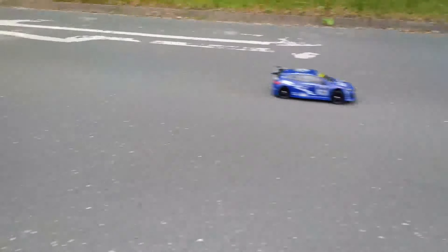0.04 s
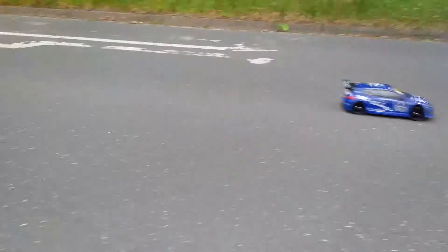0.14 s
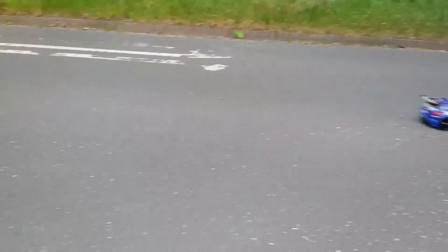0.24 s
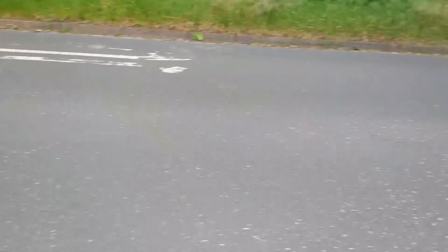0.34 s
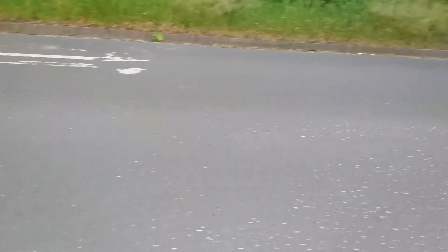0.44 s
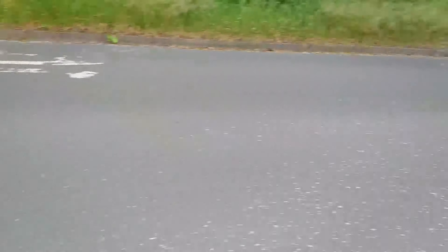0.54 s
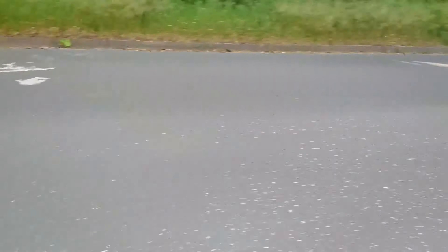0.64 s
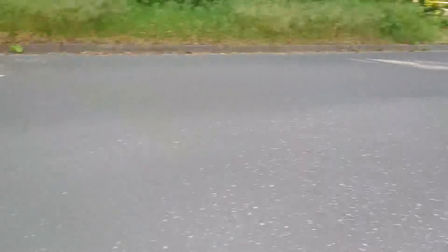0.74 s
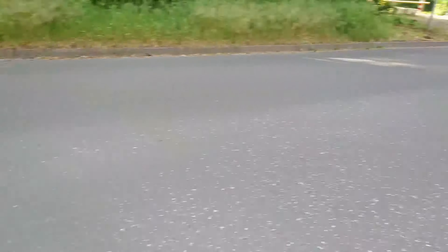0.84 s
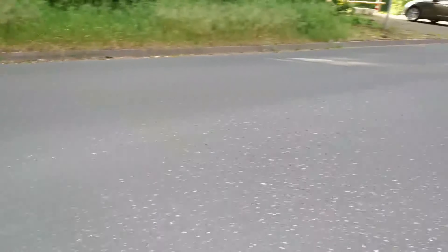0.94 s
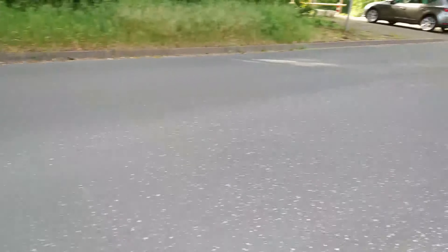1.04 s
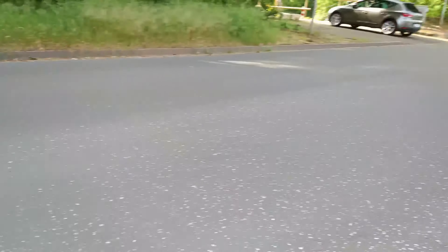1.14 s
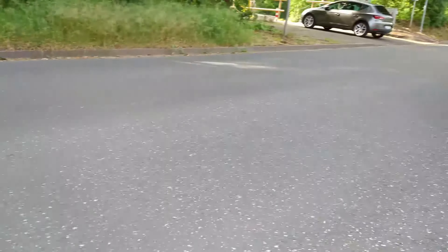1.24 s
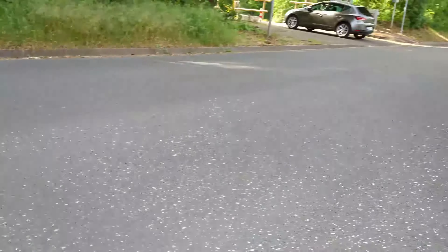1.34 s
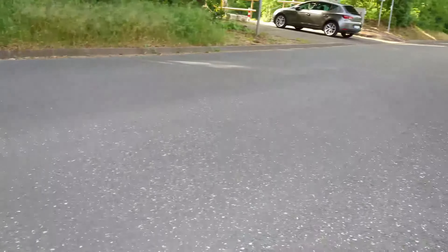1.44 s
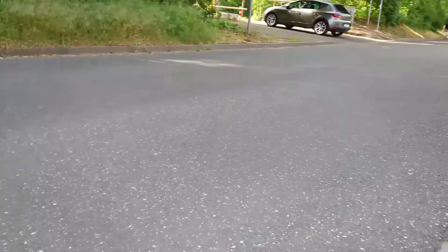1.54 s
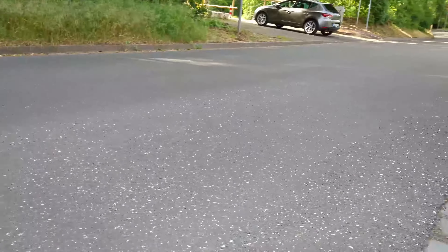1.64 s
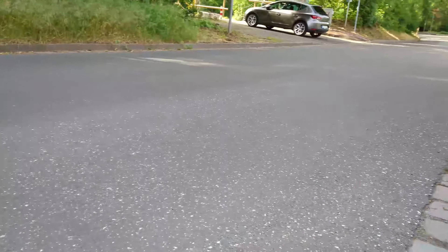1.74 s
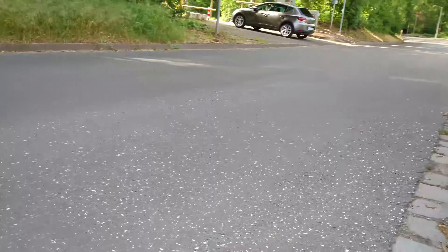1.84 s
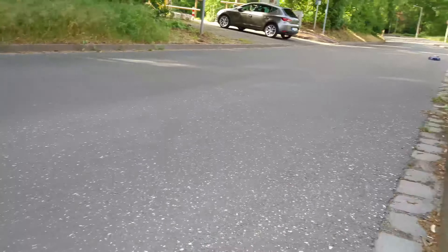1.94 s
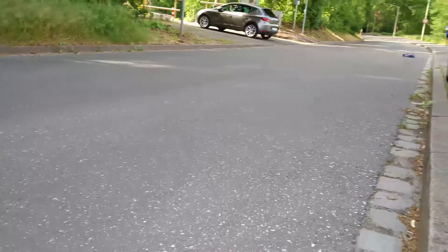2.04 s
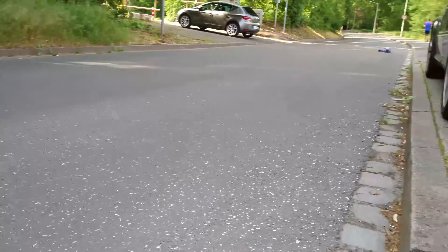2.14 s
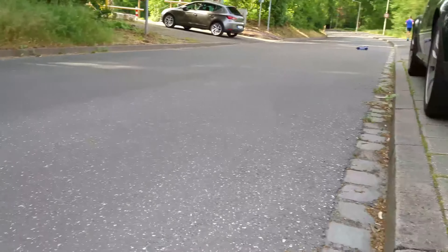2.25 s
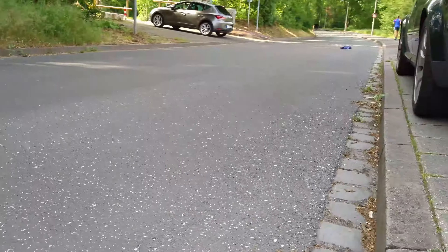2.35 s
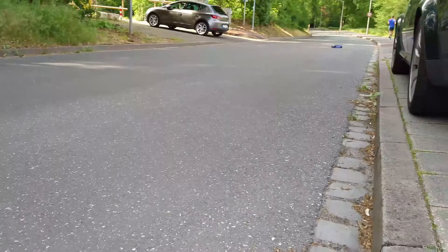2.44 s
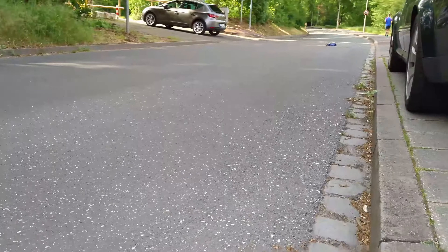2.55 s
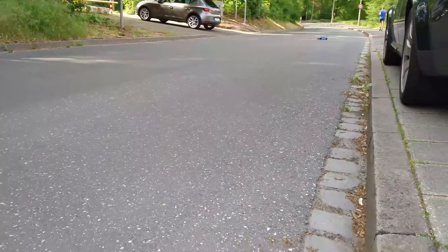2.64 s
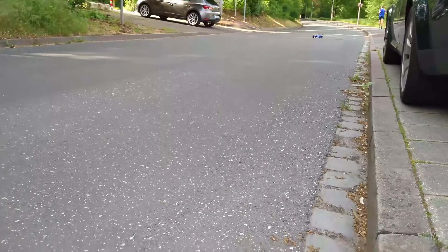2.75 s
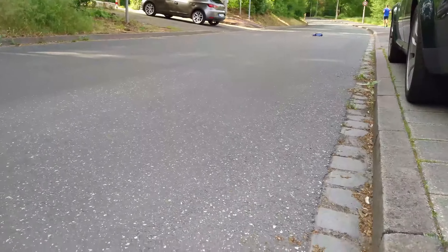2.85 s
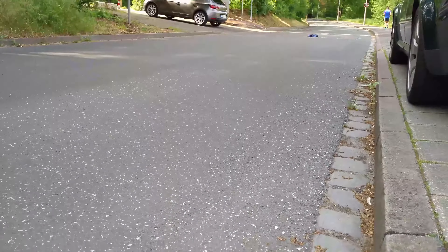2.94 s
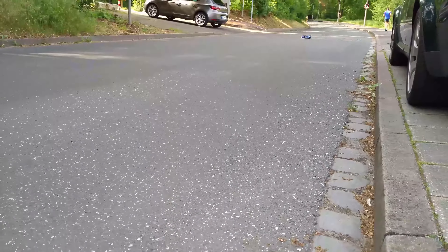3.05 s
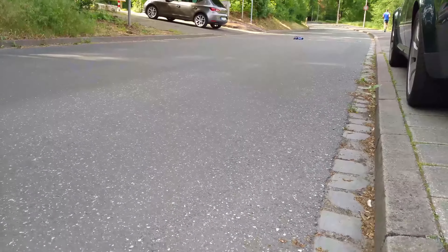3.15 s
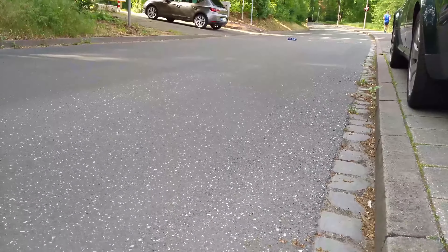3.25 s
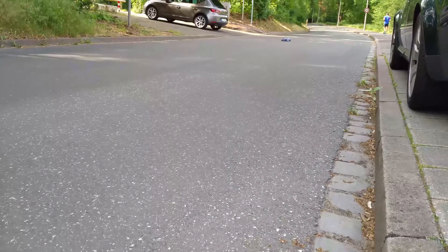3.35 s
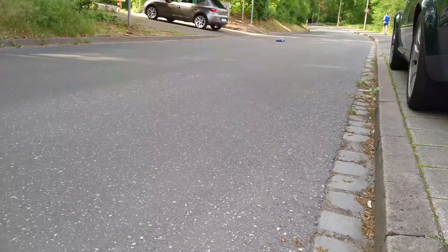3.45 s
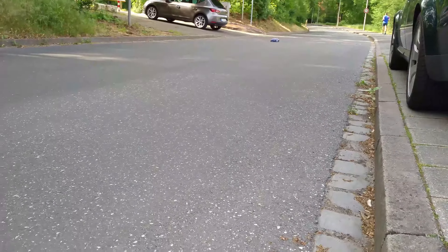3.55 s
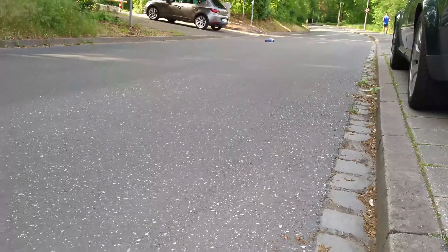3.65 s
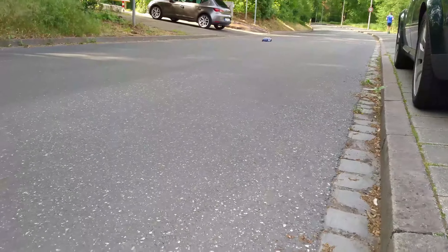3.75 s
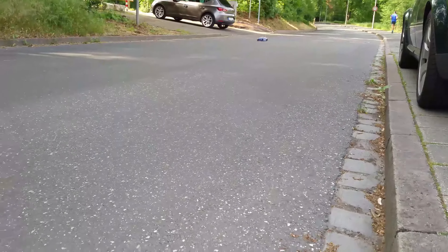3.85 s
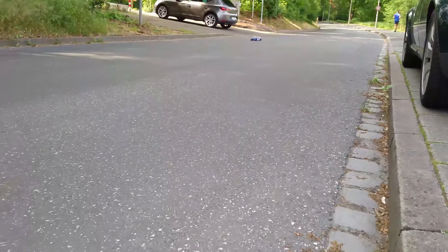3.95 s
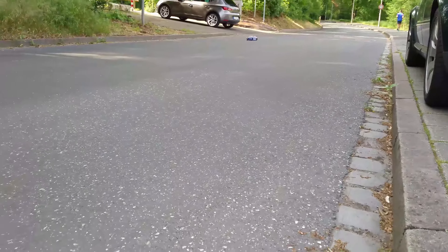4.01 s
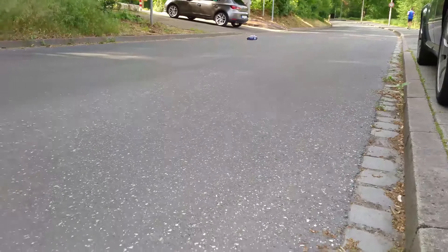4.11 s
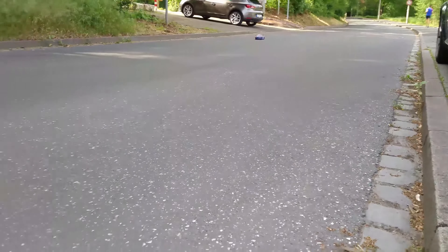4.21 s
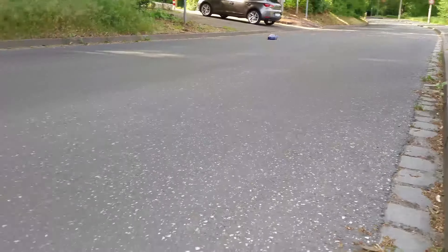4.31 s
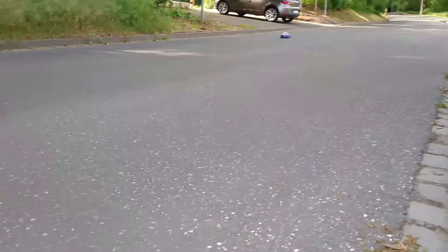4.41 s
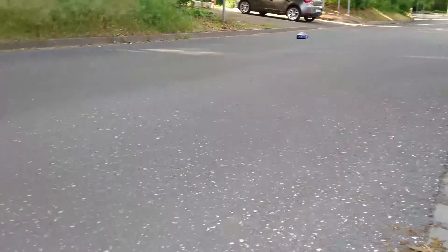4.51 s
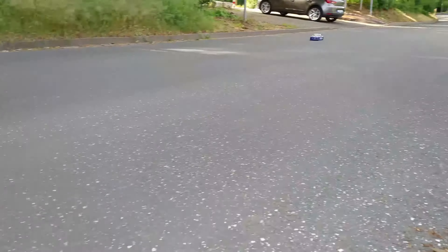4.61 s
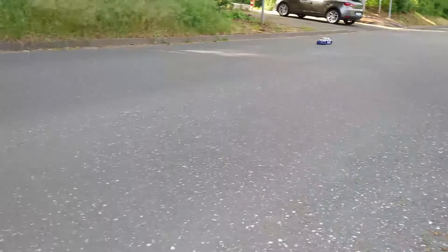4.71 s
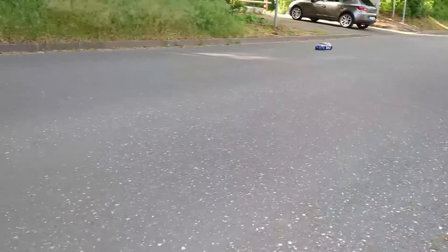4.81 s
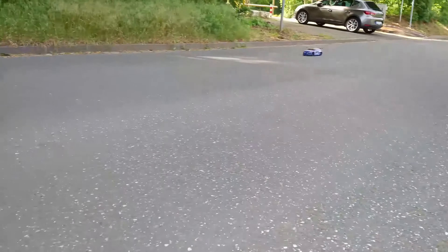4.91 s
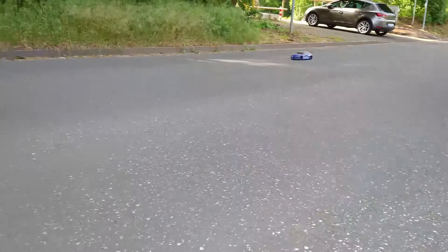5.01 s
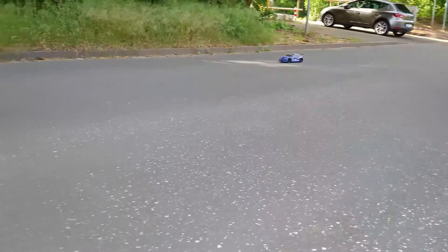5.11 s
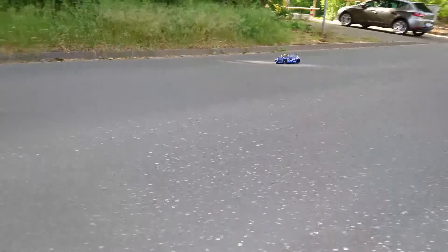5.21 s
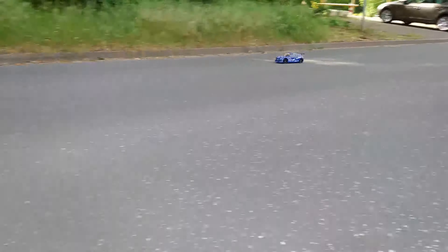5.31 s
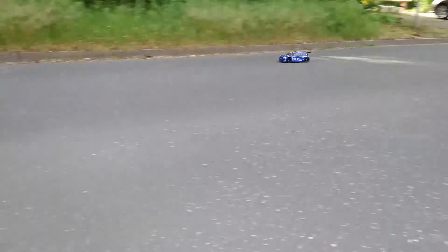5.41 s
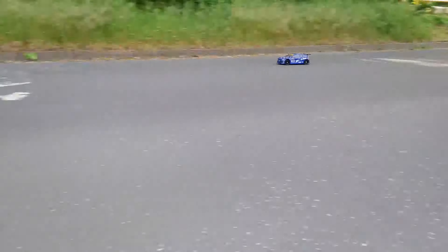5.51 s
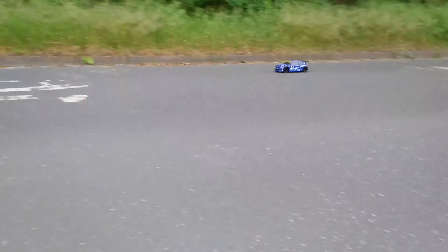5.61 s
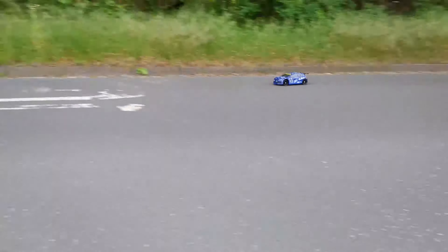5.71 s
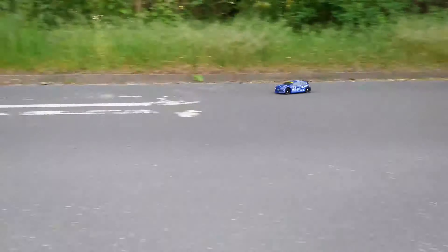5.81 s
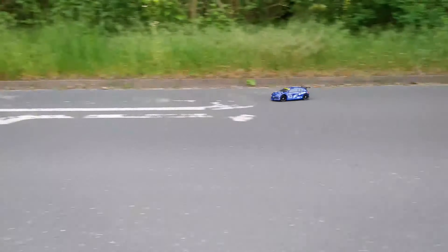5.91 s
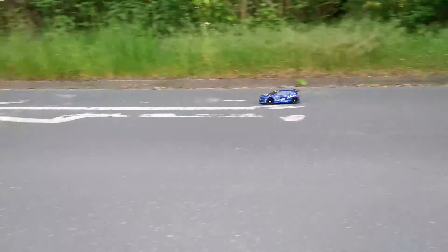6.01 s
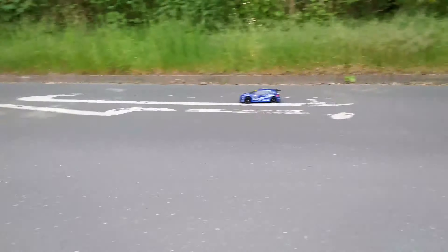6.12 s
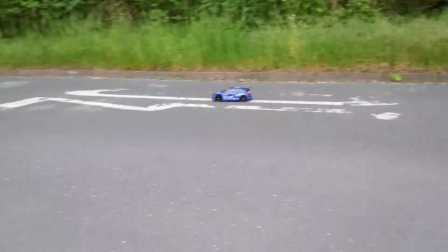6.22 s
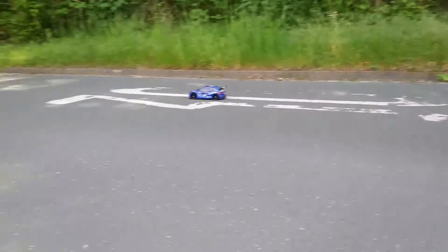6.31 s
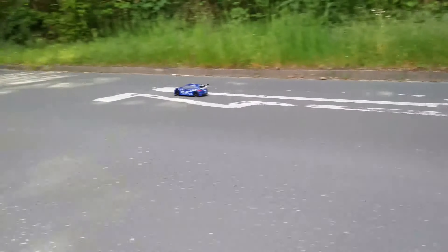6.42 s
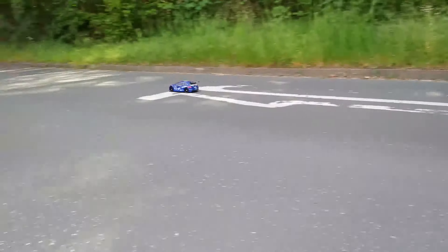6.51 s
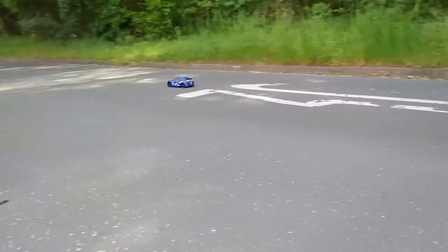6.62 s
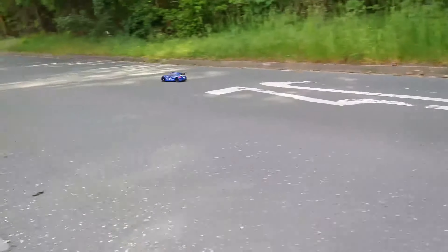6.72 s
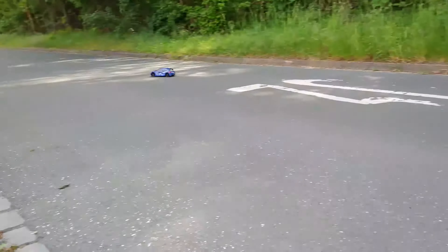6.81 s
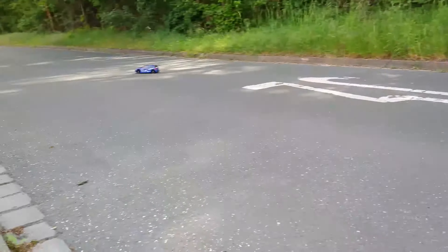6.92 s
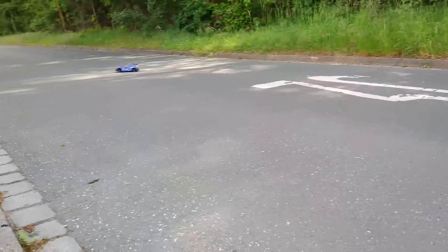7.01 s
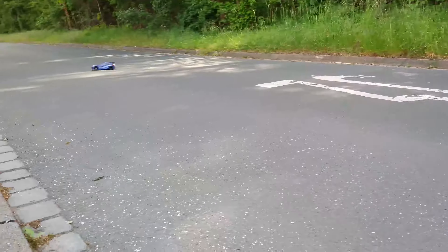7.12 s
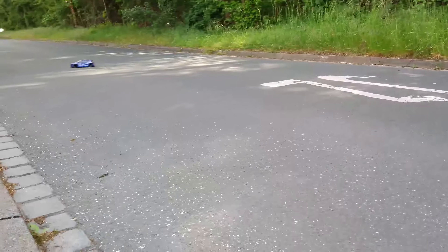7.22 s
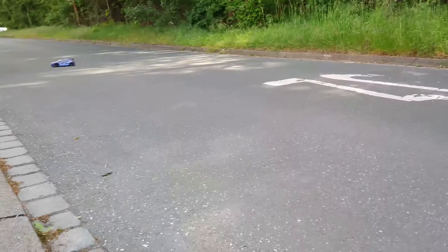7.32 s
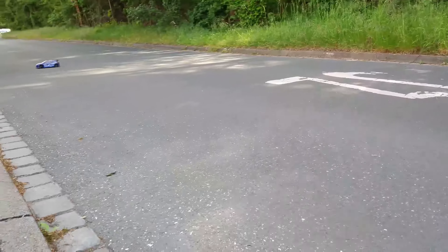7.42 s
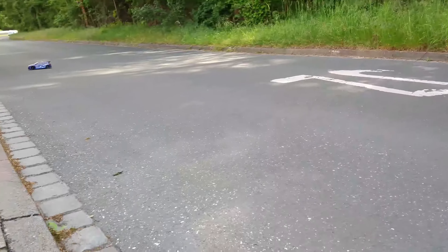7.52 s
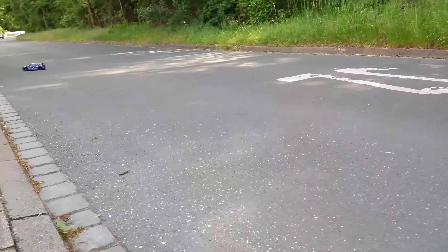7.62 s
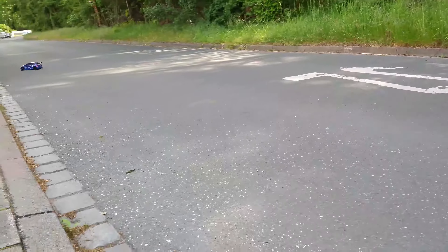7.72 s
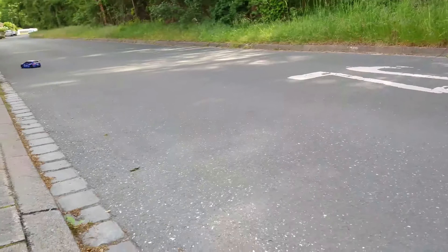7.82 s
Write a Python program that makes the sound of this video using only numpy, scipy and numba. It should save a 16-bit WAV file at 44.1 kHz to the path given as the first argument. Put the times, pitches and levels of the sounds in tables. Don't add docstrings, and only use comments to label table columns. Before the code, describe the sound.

A radio-controlled car close by screams away on asphalt, its gritty gear whine rising in pitch and fading within a second. Faint tyre hiss, then hollow plastic knocks as it turns far off. A short throttle chirp, then the whine returns, swells past with rapid gear ticks, cuts off and brakes with a falling whirr. Outdoor street, faint distant rumble, handheld phone near the kerb, thin and bright.

```python
import sys
import numpy as np
from scipy import signal
from scipy.fft import rfft, irfft
from scipy.io import wavfile
from scipy.ndimage import uniform_filter1d, map_coordinates
from numba import njit

SR = 44100
rng = np.random.default_rng(int(sys.argv[2]) if len(sys.argv) > 2 else 0)


def amplitude_ratio(level_db):
    exponent = np.asarray(level_db, float) / 20
    return 10 ** exponent


def unload_wav(signal):
    wavfile.write(
        sys.argv[1],
        SR,
        np.round(np.clip(np.atleast_2d(signal).T, -1, 1) * 32767).astype(np.int16),
    )


N = 346626


def level(x, db):
    return x * amplitude_ratio(db) / np.sqrt(np.mean(x ** 2))


def track(rows):
    s, *columns = np.transpose(rows)
    t = np.arange(N) / SR
    gate = np.clip(np.minimum(t - s[0], s[-1] - t) / 0.025 + 1, 0, 1)
    return [np.interp(t, s, c) for c in columns] + [gate]


def swells(rows, step=64):
    t = np.arange(N) / SR
    s, half, *columns = np.transpose(rows)
    bell = np.exp(-((t[::step, None] - s) / np.maximum(half, .005)) ** 2)
    return [np.interp(t, t[::step], bell @ c) for c in columns]


def walk(rate):
    coarse = np.repeat(rng.standard_normal(int(rate * N / SR) + 2), 4)
    coarse = uniform_filter1d(coarse, 4)
    return 1.25 * np.interp(np.arange(N) * 4 * rate / SR, np.arange(len(coarse)), coarse)


@njit
def svf(x, hz, width):
    y, state, g, k = x.copy(), np.zeros(4), 0., 0.
    for i in range(len(x)):
        if i % 32 == 0:
            g, k = np.tan(np.pi * hz[i] / SR), width / hz[i]
        for j in (0, 2):
            v = (state[j] + g * (y[i] - state[j + 1])) / (1 + g * (g + k))
            state[j], state[j + 1], y[i] = 2 * v - state[j], state[j + 1] + 2 * g * v, k * v
    return y


def delay(x, samples):
    return map_coordinates(x, [np.arange(N) - samples], order=1, mode="nearest")


def spur(mesh_hz, sharp, scatter_db):
    teeth = 81
    turn = np.cumsum(mesh_hz / teeth * (1 + 0.0812 * walk(40))) / SR
    force = amplitude_ratio(scatter_db * rng.standard_normal(2000))[turn.astype(int) % 2000]
    bite = np.abs(np.sin(np.pi * turn)) ** (2 * np.maximum(sharp, .1))
    return level(0.77 + force * bite, 0)


# start in seconds, tooth mesh in Hz, level in dB.
LEAVING = [(0, 5340, -22), (.1, 5750, -20), (.2, 6240, -19), (.35, 6674, -12), (.48, 6950, -19),
           (.6, 7350, -33), (.8, 7680, -36), (1.15, 7510, -43)]
TURNING = [(2.41, 1550, -50), (2.5, 1650, -54), (2.62, 1850, -59), (2.72, 2300, -55), (2.85, 2350, -58),
           (2.96, 2650, -50), (3.06, 3050, -53), (3.15, 3300, -59)]
SURGING = [(3.22, 3250, -64), (3.3, 3380, -58), (3.4, 3550, -55), (3.5, 3850, -55), (3.58, 4050, -60)]
BLIP = [(3.69, 4800, -56), (3.77, 5050, -46), (3.83, 5250, -41), (3.89, 5330, -38), (3.945, 5400, -41),
        (3.97, 5400, -55)]
NEARING = [(4.149, 5160, -58), (4.249, 5160, -44.5), (4.4, 5250, -44), (4.55, 5610, -40),
           (4.68, 6010, -31.5), (4.8, 6080, -34), (4.94, 6100, -39)]
PASSING = [(5.02, 6150, -47), (5.12, 6165, -36.5), (5.4, 6470, -25.5), (5.55, 6460, -29.5),
           (5.88, 6380, -26), (6.08, 6570, -20), (6.2, 6630, -28), (6.4, 6765, -26.5), (6.66, 6710, -26.5)]
BRAKING = [(7.08, 3196, -56), (7.2, 3106, -48.5), (7.301, 3080, -41.5), (7.36, 2654, -49),
           (7.47, 1720, -59), (7.55, 1756, -71)]
GEARS = [LEAVING, TURNING, SURGING, BLIP, NEARING, PASSING, BRAKING]


def gears():
    hz, mesh_db, _ = track(np.vstack(GEARS))
    gate = np.minimum(sum(track(rows)[-1] for rows in GEARS), 1)
    speed = hz / 6500

    steady = np.sin(2 * np.pi * np.cumsum(hz) / SR + 0.58 * walk(150))

    def noise_line(ratio, width):
        centre = np.minimum(ratio * hz, 15000)
        return level(svf(rng.standard_normal(N), centre, width), 0)

    smear, octave, half = noise_line(1, 400.), noise_line(2, 600.), noise_line(.5, 260.)

    hush_s, hush_db = .007, -9
    hush = swells([(s + hush_s / 2, hush_s, hush_db) for s, *_ in BITES])[0]
    hush = np.maximum(hush, hush_db)
    brake_db = -25 * (np.gradient(hz) * SR < -300)
    mesh = amplitude_ratio(mesh_db + 4.5 + hush + brake_db) * (.5 * speed * steady + .85 * smear)

    mesh = mesh + amplitude_ratio(mesh_db) * np.exp(-((hz / 2 - 2530) / 170) ** 2) * half
    mesh = mesh * spur(hz, sharp=1.6 * speed ** 2, scatter_db=1.2)

    octave_db = mesh_db + np.maximum(11 - 8.5 * np.abs(2 * hz - 6450) / 1000, -38)
    octave = amplitude_ratio(octave_db + 6) * octave * spur(hz, sharp=.7, scatter_db=2.1)
    return gate * (mesh + octave)


# start in seconds,
# peak in dB, pitch in Hz.
GEAR_BITES = [(.004, -10.5, 5270), (.265, -11, 6320), (.278, -12, 6400), (.363, -13, 6650), (.413, -13, 6800),
              (5.788, -17, 6430), (5.8875, -12, 6400), (6.06, -15, 6580), (6.125, -17, 6500),
              (2.276, -32, 6400), (2.302, -32, 5940), (2.412, -34, 6500), (2.6798, -29, 6200),
              (2.7482, -32, 6400), (2.983, -23, 5400), (5.985, -20, 4800), (6.012, -21, 5000),
              (3.085, -34, 6388), (7.1061, -30, 6764), (7.1495, -21, 6060), (7.1674, -22, 6140),
              (7.2572, -21, 6000), (7.27, -23, 6100), (7.2967, -17, 5900), (7.31, -25, 5920), (7.33, -25, 6170),
              (7.5626, -31, 6530), (7.637, -23.5, 6140), (7.6494, -27, 6570),
              (0.0218, -14, 6500), (0.0348, -7, 6380), (0.0533, -12, 6410), (0.0662, -11, 6520),
                 (0.0742, -7, 6450), (0.0942, -13, 6740), (0.1064, -8, 6500), (0.1615, -15, 6730),
                 (0.175, -15, 5820), (0.189, -11, 6030), (0.2014, -7, 6150), (0.2284, -10, 6280),
                 (0.2394, -8.5, 6300), (0.2548, -12.5, 6270), (0.2907, -4, 6420), (0.3032, -8, 6420),
                 (0.3142, -7, 6650), (0.3273, -7, 6630), (0.3401, -10, 6560), (0.3526, -7, 6620),
                 (0.375, -8, 6700), (0.389, -7, 6650), (0.402, -5, 6760), (0.431, -14, 6800),
                 (0.4477, -16, 6930), (0.458, -14, 6830), (0.4718, -9, 6930), (0.505, -12, 7020),
                 (0.5302, -18, 7100),
              (3.7312, -33, 5400), (3.7677, -25, 6790), (3.7836, -28, 6800), (3.8443, -23, 5340),
                 (3.8769, -26, 5380), (3.8902, -20.5, 5330), (3.9353, -27, 5350), (3.951, -27, 5410),
                 (4.0894, -32, 6910), (4.1543, -35, 6300), (4.1807, -33, 6900), (4.2172, -28.5, 6310),
                 (4.2536, -31, 5090), (4.2945, -34, 5140), (4.3723, -33, 5290), (4.3888, -31, 6230),
                 (4.519, -30, 5430), (4.5475, -30, 7300), (4.6162, -27, 5800), (4.6312, -26, 5800),
                 (4.6844, -26, 6060), (4.7145, -20, 6100), (4.728, -22, 5930), (4.7539, -24, 6000),
                 (4.7814, -25, 6100), (4.809, -26, 6080), (4.8205, -24, 6100), (4.8437, -24, 6100),
                 (4.8846, -24, 6100), (4.911, -23, 6060),
              (5.161, -22.5, 6490), (5.1946, -23, 6470), (5.2136, -23, 6290), (5.225, -21, 6460),
                 (5.2595, -20, 6240), (5.272, -21, 6190), (5.2859, -20, 6230), (5.3163, -24, 6400),
                 (5.3491, -14.5, 6450), (5.3987, -20, 6390), (5.4121, -18, 6330), (5.4261, -21, 6330),
                 (5.4416, -18, 6340), (5.4889, -26, 6380), (5.5009, -22.5, 6270), (5.5656, -23, 6170),
                 (5.6261, -16, 6470), (5.685, -17, 6460), (5.7, -14, 6580), (5.7129, -20.5, 6400),
                 (5.7409, -18, 6430), (5.761, -16.5, 6450), (5.7728, -14, 6460), (5.809, -15, 6380),
                 (5.8352, -9, 6440), (5.8506, -14, 6450), (5.8746, -9.5, 6410), (5.8982, -12.5, 6500),
                 (5.913, -13, 6450), (5.9304, -14.5, 6400), (5.9604, -23, 6400), (6.0217, -18, 6480),
                 (6.0477, -10, 6580), (6.0775, -16, 6480), (6.1095, -14.5, 6380), (6.145, -17, 6570),
                 (6.169, -20.5, 6650), (6.232, -21.5, 6280), (6.2604, -18, 6530), (6.2717, -17, 6550),
                 (6.2976, -17, 6510), (6.3185, -15, 6600), (6.361, -17, 6600), (6.3789, -15, 6960),
                 (6.391, -17.5, 6740), (6.4163, -20, 6700), (6.4378, -19, 6800), (6.4503, -18, 6800),
                 (6.4747, -18, 6750), (6.522, -19, 6700), (6.5366, -19, 6700), (6.558, -20, 6760),
                 (6.582, -21, 6800), (6.6056, -15, 6860), (6.64, -19, 6740), (6.7097, -24, 6270)]
BITES = GEAR_BITES
# start in seconds, peak in dB, pitch in Hz.
SLAPS = [(4.1803, -34, 2310), (4.2188, -30, 2310), (4.2365, -32, 2300), (4.293, -26, 2650),
         (4.313, -33, 2340), (4.3254, -29, 2300), (4.3707, -30, 2580), (4.3879, -31, 2620),
         (4.4043, -30, 2680), (4.4455, -25.5, 2610), (4.4915, -32, 2575), (4.5479, -31, 2360),
         (4.5888, -32, 2630), (4.6443, -35, 2320), (4.6588, -30, 2600), (4.6904, -34, 2380),
         (4.714, -31, 2640), (4.8413, -36, 2330)]


def bites():
    out, t = np.zeros(N + 2000), np.arange(2000) / SR
    for rows, rise_s, trim_db in ((BITES, .0027, 4.5), (SLAPS, .004, -2.0)):
        envelope = (t / rise_s * np.exp(1 - t / rise_s)) ** 2
        wander = np.cumsum(0.045 * rng.standard_normal((len(rows), 2000)), axis=1)
        for (s, db, hz), phase in zip(rows, wander):
            burst = np.sin(2 * np.pi * hz * t + phase) * envelope
            out[int(s * SR):][:2000] += amplitude_ratio(db + trim_db) * burst
    return out[:N]


# start in seconds, end in seconds, level in dB.
WHISTLE = [
    (-.2, .27, -38),
    (.3, 1.15, -45),
    (2.42, 3.22, -52),
    (3.15, 3.7, -54),
    (3.55, 4.05, -54),
    (4.25, 5.45, -52),
    (6.25, 6.75, -46),
]
# time in seconds, pitch in Hz.
WHISTLE_HZ = [(0, 8025), (.37, 7935), (.84, 7850), (1.1, 7840), (2.5, 7975), (2.85, 8050), (3.1, 8070),
              (3.9, 8130), (4.55, 8160), (5.45, 8115), (6.3, 7990), (6.69, 7930)]


def whistle():
    t, on = np.arange(N) / SR, 0
    fade_s, pinion_teeth, depth = .15, 11.5, .25
    for start, end, db in WHISTLE:
        on = on + amplitude_ratio(db) * np.clip(np.minimum(t - start, end - t) / fade_s, 0, 1)
    motor_turn = np.cumsum(track(np.vstack(GEARS))[0]) / pinion_teeth / SR
    throb = 1 + depth * amplitude_ratio(5 * walk(5)) * np.sin(2 * np.pi * motor_turn)
    tone = np.sin(2 * np.pi * np.cumsum(track(WHISTLE_HZ)[0]) / SR + .5 * walk(40))
    return on * throb * amplitude_ratio(4 + 2.5 * walk(14)) * tone


# time in seconds, level in dB.
ROLL = [(0, 0), (.5, -3), (.8, -6), (1.1, -9.5), (1.65, -14.5), (2.14, -14), (2.55, -16), (3.05, -23.5),
        (3.649, -19), (4.0, -15.5), (4.5, -14), (4.9, -12), (5.4, -9), (5.8, -6), (6.55, -6), (6.7, -8.5),
        (7.2, -7), (7.86, -21)]
# time in seconds, level in dB.
LOAD = [(0, 16), (.3, 8.5), (.85, 5), (1.2, 5), (1.5, 2), (2.5, -5.5), (3.0, 14.5), (3.3, 9), (3.7, 12),
        (3.8, 21.5), (3.92, 18.5), (3.99, 6), (4.3, 7), (4.8, 11), (4.95, 7), (6.6, 9.5), (6.72, 3.5),
        (7.7, 6.5)]
# centre in seconds, half length in seconds, thump and hiss in dB.
SCUFFS = [(.14, 0.042, 3.5, 0.5), (1.92, 0.11, 4, -0.5), (2.135, 0.094, 4.5, 3.5), (2.21, 0.055, 0, -4.5),
          (2.291, 0.048, 9, 6), (2.344, 0.018, 4.5, -3.5), (2.385, 0.02, -11, -7), (2.45, 0.11, 9, 1),
          (4.165, 0.088, -2, 6.5), (4.245, 0.076, 5, -2), (5.777, 0.13, 3.5, -2), (5.913, 0.015, 6.5, -6),
          (6.24, 0.018, 2, 3), (6.943, 0.15, 1, 0), (7.402, 0.017, 5, 3.5), (7.56, 0.058, -0.5, 4.5),
          (7.67, 0.064, 1, 3.5)]
# level in dB at full roll, then dB per dB of roll, of load, of thump, of hiss.
LAYERS = dict(tyres=(-43, 0.7942, 0., 1.0, 0.), grit=(-36, 1.37, 0., 0., 1),
          low=(-37.5, 1.2, -0.1, 0.2, 0.1), rings=(-49.5, 0.95, 1.0842, -0.9, -0.3),
          clatter=(-31.5, 1.03, 0., 0.22, 0.56), whirr=(-22, 1.1367, 0.3859, 0.28, 0.54),
          strain=(-39.5, 1, 1.23, 0.5, 0.8), rumble=(-50.5, 0.39, 0., 0.36, 0.))


def layer_db(name):
    base, *slopes = LAYERS[name]
    causes = (track(ROLL)[0], track(LOAD)[0], *swells(SCUFFS))
    return base + sum(slope * cause for slope, cause in zip(slopes, causes))


def rattle(modes, alike, patchy_db, flicker_db, drift=0.022):
    out, alike = 0, np.clip(alike, 0, .99)
    for hz, width, db in modes:
        centre = np.minimum(hz * (1 + drift * walk(1.533)), .45 * SR)
        swell = amplitude_ratio(db + patchy_db * walk(1.705) + flicker_db * walk(18))
        pair = [swell * svf(rng.standard_normal(N), centre, 2.03 * width) for _ in range(2)]
        out = out + np.array(pair)
    out = np.sqrt([[alike], [1 - alike], [1 - alike]]) * [*out, np.roll(out[1], N // 3)]
    return out / np.sqrt(np.mean(out[0] ** 2 + out[1] ** 2))


# centre in Hz, width in Hz, level in dB.
TYRES = [(231, 96, 1), (450, 91, 0), (713, 208, 1.5)]
CHASSIS = [(1502, 220, 1), (2057, 290, 4.5), (2460, 480, 0), (3140, 380, -0.5), (3673, 360, -1.5)]
DRIVE = [(4510, 590, -8.5), (5016, 410, -7), (5545, 180, -7.5), (5970, 320, 1.5), (6500, 330, 1.5),
         (6950, 350, 1), (7290, 180, -7.5), (7840, 570, -8), (8740, 910, -13.5)]
GRIT = [(9900, 3200, 1.7), (11680, 750, 0.98), (13500, 790, 0.44), (15000, 1050, -1.5)]
# centre in Hz, width in Hz, level in dB.
STRAIN = [(4800, 230, -10), (5400, 280, -1), (7150, 450, 0)]
# time in seconds, pitch in Hz.
LOW_RING = [(0, 1206), (.4, 1240), (.9, 1366), (3.2, 1236), (4.9, 1360), (6.2, 1183), (7.2, 1154),
            (7.7, 1136)]
RINGS = [2300, 2640]
# centre and half length in seconds, low, middle and upper ring in dB.
SHUDDERS = [(0.0, .02, -0.5, -15, 3), (.08, 0.11, 5, -13, 3), (0.473, 0.13, -3, 16.5, 4),
            (.83, 0.056, 1, 15.5, 8), (1.3, 0.19, 5, -6, 4), (3.038, 0.049, 8, -11, -1),
            (3.6, 0.35, -3, 4.5, 4.5), (3.84, 0.061, 2, -2, -5), (4.23, 0.052, 0, 12, -9),
            (4.435, 0.19, -6, 10.5, 10), (4.694, 0.2, -2.5, 2.5, 4), (5.3, 0.19, 3.5, 4, 7),
            (6.2, 0.37, 2.5, 2, 1), (6.46, 0.12, 0, 3, -2), (7.0, 0.29, 2, -17, 0),
            (7.64, 0.043, 4, 16, -3)]


def rolling():
    shake = spur(track(np.vstack(GEARS))[0], sharp=1.2, scatter_db=2.5)
    out = amplitude_ratio(layer_db("tyres")) * rattle(TYRES, alike=0.95, patchy_db=1.0, flicker_db=1.5)
    out += amplitude_ratio(layer_db("grit")) * rattle(GRIT, alike=0.078, patchy_db=1.0, flicker_db=1.5)

    low_db, *ring_db = swells(SHUDDERS)
    low = rattle([(track(LOW_RING)[0], 100, 0)], alike=.75, patchy_db=1, flicker_db=1.5, drift=.006)
    out += amplitude_ratio(layer_db("low") + low_db) * low
    for hz, shudder_db in zip(RINGS, ring_db):
        ring = rattle([(hz, 90, 0)], alike=.75, patchy_db=.4, flicker_db=2, drift=.008)
        out += amplitude_ratio(layer_db("rings") + shudder_db) * (.1 + .9 * shake) * ring

    clatter = rattle(CHASSIS, alike=0.55, patchy_db=.6, flicker_db=2.0, drift=.005)
    out += amplitude_ratio(layer_db("clatter")) * (0.7 + 0.3 * shake) * clatter
    whirr = rattle(DRIVE, alike=0.3, patchy_db=.5, flicker_db=2.0, drift=.004)
    out += amplitude_ratio(layer_db("whirr")) * (0.58 + 0.41 * shake) * whirr
    strain = rattle(STRAIN, alike=0.4, patchy_db=.5, flicker_db=2.0, drift=.006)
    return out + amplitude_ratio(layer_db("strain")) * (0.3 + 0.7 * shake) * strain


# start in seconds, peak in dB, ring in Hz, t60 in seconds, crack in dB.
KNOCKS = [
    (2.246, -37, 286, 0.12, 8),
    (2.275, -36, 480, 0.053, 4),
    (2.302, -33, 1760, 0.066, -6),
    (2.349, -29.5, 361, 0.089, -13),
    (2.413, -29, 1480, 0.064, -5),
    (2.449, -35, 1650, 0.061, -8),
    (3.308, -37, 923, 0.033, -10),
    (4.178, -40.5, 862.4, 0.096, -6),
    (7.395, -38, 992, 0.22, -5),
    (7.459, -34, 1717, 0.1, -7),
]


def knocks():
    out, t = np.zeros(N + 8000), np.arange(8000) / SR
    for s, db, hz, t60, crack_db in KNOCKS:
        ring = np.sin(2 * np.pi * hz * t) * np.exp(-np.log(1000) * t / max(t60, .005))
        crack = amplitude_ratio(crack_db) * rng.standard_normal(8000) * np.exp(-t / 0.0025)
        out[int(s * SR):][:8000] += amplitude_ratio(db - 3.5) * (ring + crack)
    return out[:N]


# frequency in Hz, density in dB per Hz.
TOWN = [(15, -52), (25, -13.5), (75, 5.5), (217, 1), (356, -7.5), (548, -10), (746, -4), (1000, -34),
        (1300, -46), (2200, -120)]
# centre in seconds, half length in seconds, pitch in Hz, level in dB.
HUM = [
    (0.1, 0.2, 79, -52),
    (.9, .4, 79, -51),
    (7.34, .16, 1010, -49),
    (7.48, .04, 1720, -50),
]


def town():
    town_hz, town_db = np.transpose(TOWN)
    hz = np.arange(N // 2 + 1) * SR / N + 1
    colour = amplitude_ratio(np.interp(np.log(hz), np.log(town_hz), town_db))
    mid, side = irfft(rfft(rng.standard_normal((2, N))) * colour, N)
    rumble = level(mid + 0.13 * side * np.array([[1], [-1]]), 1.6)
    t, hum = np.arange(N) / SR, 0
    for s, half, f, db in HUM:
        hum = hum + amplitude_ratio(db + walk(10)) * np.exp(-((t - s) / half) ** 2) * np.sin(2 * np.pi * f * t)
    return hum + amplitude_ratio(layer_db("rumble") + 1.8 * walk(7.6)) * rumble


# time in seconds, right port dip in dB, kerb echo in milliseconds.
BEARING = [(0.0, 17, 2.02), (0.48, 20, 2.68), (0.92, 15, 2.78), (1.25, 17, 2.5), (2.3, 15, 2.52),
           (2.96, 11, 2.5), (3.79, 15, 2.57), (4.24, 14, 2.35), (6.13, 22.5, 2.4), (6.83, 12.5, 2.43),
           (7.38, 17, 2.34), (7.86, 14.5, 2.22)]
# time in seconds, lag in samples.
LAG = [(0, 2), (.6, 11), (1.6, 9), (3, 3), (5.6, 2), (6.2, -1), (7.8, -10)]


def scene():
    dip_db, echo_ms, _ = track(BEARING)
    common, left, right = rolling()
    car, tone = common + gears() + knocks() + bites(), whistle()
    left = delay(car, np.round(track(LAG)[0])) + left
    right = car + right

    def kerb(x, ms):
        return x + .3 * delay(x, ms * SR / 1000) - .25 * delay(x, ms * SR / 1570)

    left, right = kerb(left, echo_ms), kerb(right, echo_ms - 0.22)
    port_hz, port_width_hz = 6650, 2560
    hz = np.arange(N // 2 + 1) * SR / N
    ring = irfft(rfft(right) * np.exp(-((hz - port_hz) / port_width_hz) ** 2), N)
    right = right - (1 - amplitude_ratio(-dip_db - 2.5)) * ring
    return np.array([left + tone, right + amplitude_ratio(-3) * tone]) + town()


def band_limit(x):
    return signal.sosfilt(signal.butter(12, 15830, fs=SR, output="sos"), x)


def record(dry):
    mix = np.tanh(dry)
    return band_limit(mix)


dry = scene()
out = record(dry)
unload_wav(out)
```